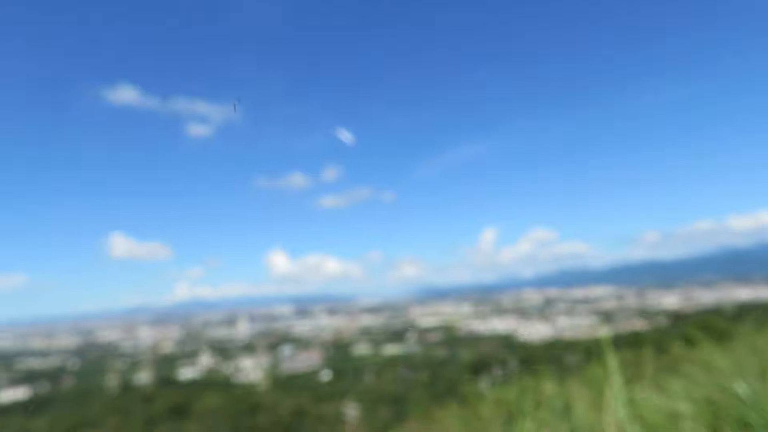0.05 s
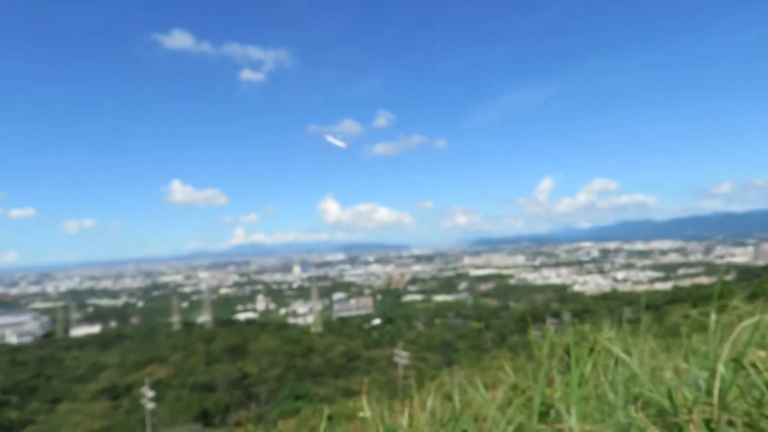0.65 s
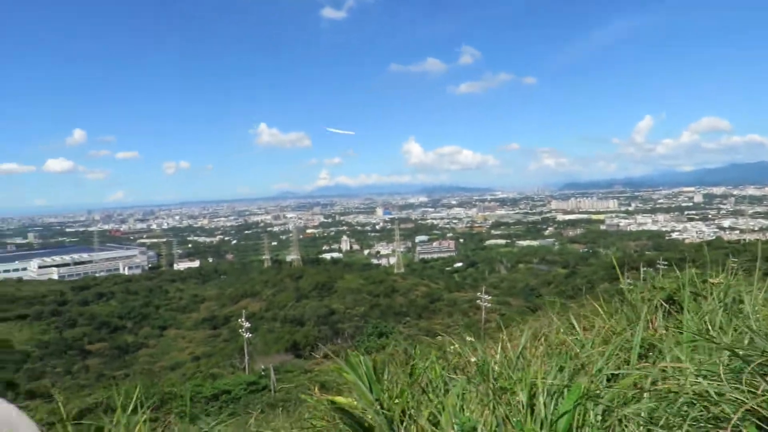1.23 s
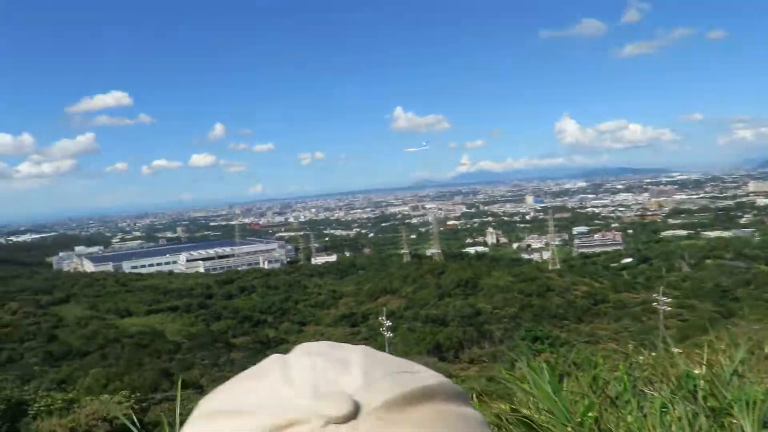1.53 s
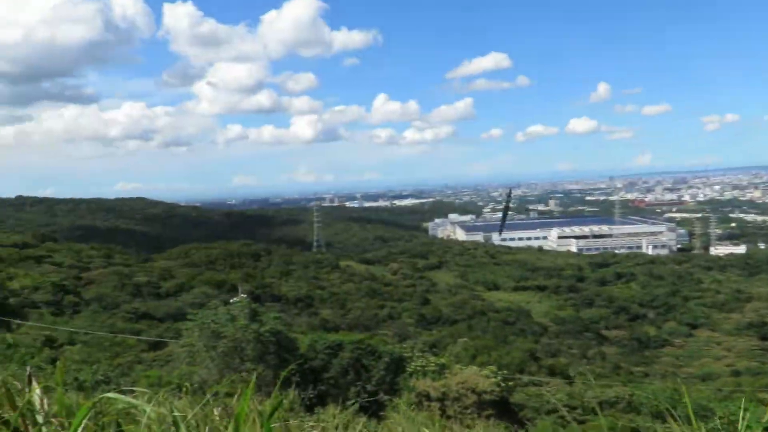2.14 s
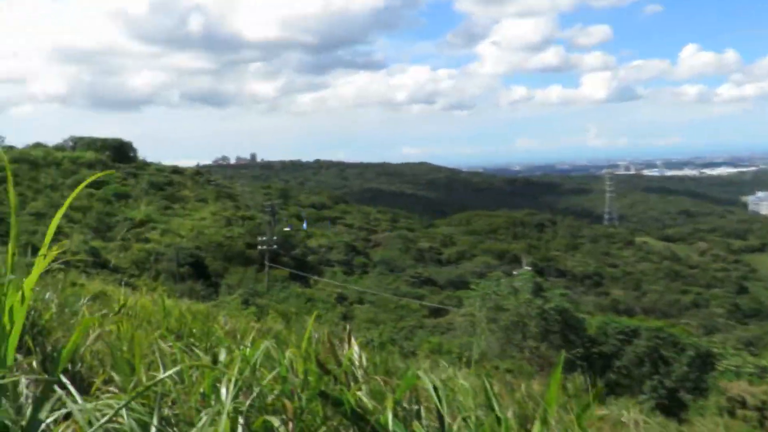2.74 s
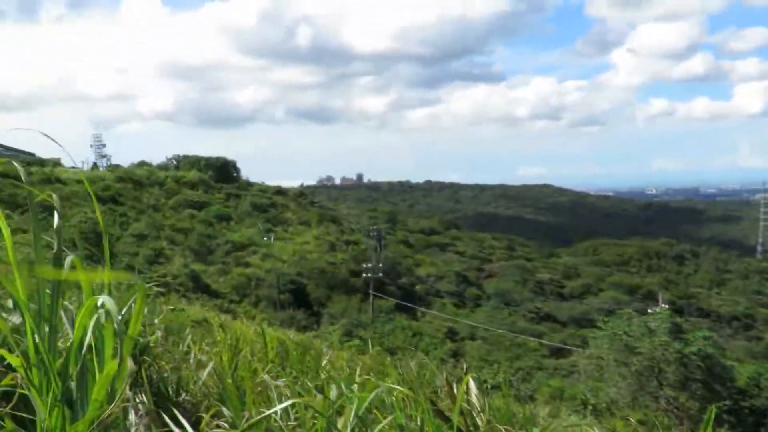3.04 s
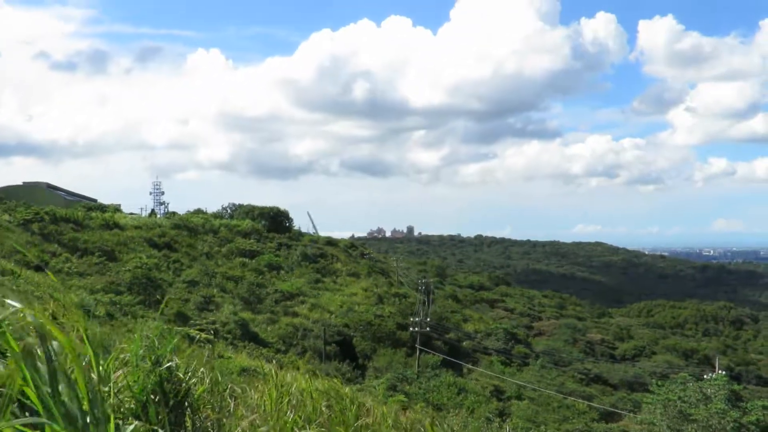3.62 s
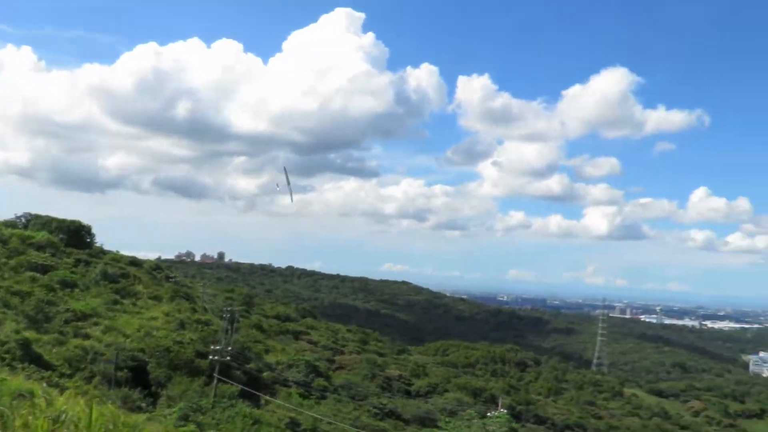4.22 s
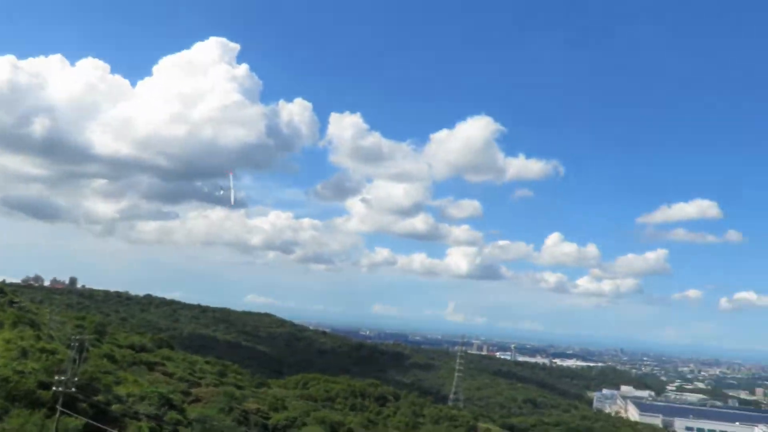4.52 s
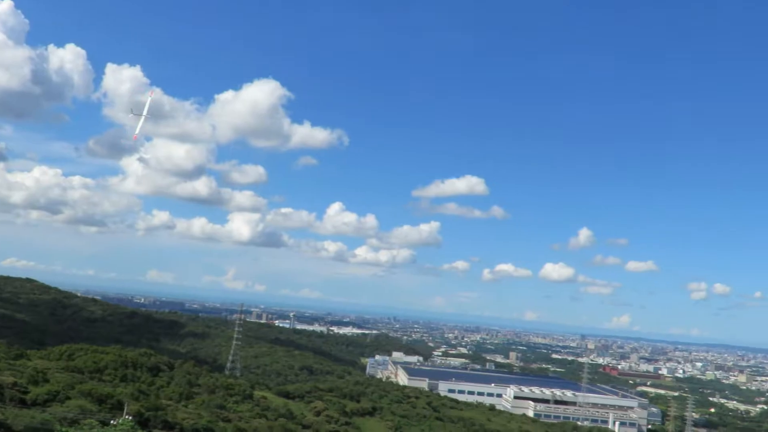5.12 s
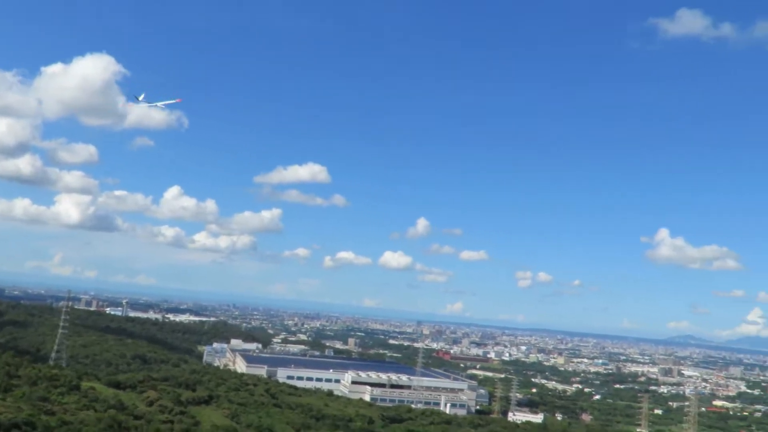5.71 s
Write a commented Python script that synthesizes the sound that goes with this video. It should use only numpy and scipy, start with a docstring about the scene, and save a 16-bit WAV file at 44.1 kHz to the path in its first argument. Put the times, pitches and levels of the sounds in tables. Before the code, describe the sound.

Wind buffets a camera's microphone on an open hilltop from the start, with uneven low thuds and rumbles that build to a rough roar around 1 second. A faint hiss of grass lies underneath. Near 1.8 seconds something hard clicks against the camera, slightly left, with a very short ring. The wind eases, and at about 2.3 seconds a model glider passes with a soft airy rush and a faint, falling whistle. A second sharp click comes at 2.9 seconds amid lighter gusts, and a few soft, dull ticks are scattered around. A hard, rasping gust hits from about 3.4 to 3.8 seconds. A quieter stretch follows from 4 to 5 seconds, with faint, brief whistles from the distant wings. Strong gusts return just after 5 seconds, with another faint whistle between them, and thump and roar loudest from 5.5 until about 6 seconds.

```python
"""From the start, gusts on a grassy hilltop buffet a camera's two microphone ports: turbulent pressure thuds,
rumbles and roars over the hiss of the grass. Near 1.8 s something hard clicks against the camera as it is swung
round, and the case rings. A model glider sweeps past at 2.3 s with an airy rush and a faint whistle that falls
by the Doppler effect, then its rush drops away. A second click follows at 2.9 s. Hard gusts return near 3.5 s
and after 5 s, with faint whistles of the wings between and among them."""
import sys
import numpy as np
from scipy import signal
from scipy.fft import rfft, irfft
from scipy.io import wavfile

SR = 44100
rng = np.random.default_rng(int(sys.argv[2]) if len(sys.argv) > 2 else 0)


def dump_mix(stems):
    """Bounce the given channels to the path in sys.argv[1] as a 16-bit WAV at rate SR."""
    frames = np.atleast_2d(stems).T  # one column per channel
    limited = np.clip(frames, -1, 1)  # hard clip at full scale
    pcm = np.round(limited * 32767).astype(np.int16)
    wavfile.write(sys.argv[1], SR, pcm)


N = 262836
TIME, HZ = np.arange(N) / SR, np.fft.rfftfreq(N, 1 / SR)

# gusts on the ports: start_s, end_s, buffet_db, roar_db, sway_db
GUSTS = [(0.076, 0.453, -50, -63, -38.5), (0.482, 0.526, -41.5, -52, -28.5),
         (0.599, 0.668, -30, -50.5, -27), (0.761, 0.81, -28.5, -46, -33), (0.873, 0.965, -23.5, -42, -51),
         (1.024, 1.067, -26, -27, -37), (1.092, 1.122, -23.5, -31, -49), (1.157, 1.368, -28, -45, -40),
         (1.48, 1.508, -32, -48, -33.5), (1.56, 1.708, -29.5, -40.5, -45.5),
         (1.757, 1.951, -23.5, -47, -41), (2.014, 2.133, -36, -60, -43.5), (2.306, 2.367, -43, -70, -45.5),
         (2.662, 2.967, -35, -63, -32.5), (2.798, 2.852, -26, -52, -52), (2.928, 2.977, -30, -47, -35),
         (3.201, 3.265, -40.5, -62, -41), (3.379, 3.443, -27, -43.5, -30),
         (3.466, 3.639, -21.5, -28.5, -45.5), (3.663, 3.82, -28.5, -39, -33.5),
         (3.855, 3.928, -40, -55, -54), (4.052, 4.089, -36.5, -49, -44), (4.13, 4.164, -41.5, -64, -48.5),
         (4.286, 4.404, -45.5, -71, -50.5), (5.087, 5.221, -27, -42, -38.5),
         (5.329, 5.367, -36.5, -48, -46), (5.376, 5.458, -30, -40, -40.5),
         (5.497, 5.614, -21.5, -37, -33.5), (5.711, 5.914, -25.5, -38.5, -32.5),
         (5.904, 5.95, -28.5, -37.5, -38)]
# lulls between gusts: time_s, depth_db, half_length_s
LULLS = [(0.966, 4, 0.019), (1.088, 2.5, 0.008), (1.154, 1, 0.0063), (1.175, 0.5, 0.011),
         (1.531, 18, 0.015), (2.88, 7, 0.03), (3.033, 17.5, 0.031), (3.505, 3, 0.0068), (3.537, 0.5, 0.007),
         (3.647, 6.5, 0.006), (4.35, 7, 0.0084), (4.404, 16, 0.02), (5.242, 3.5, 0.017), (5.662, 18, 0.01),
         (5.7, 0.5, 0.008), (5.791, 10, 0.013), (5.839, 17, 0.012), (5.938, 8.5, 0.012)]
# the hardest eddies that hit the ports: time_s, thump_db, roar_db, half_length_s
EDDIES = [(0.107, -29.5, -44, 0.0049), (0.213, -33, -61, 0.0035), (0.374, -33.5, -47, 0.0045),
          (0.495, -24, -53, 0.007), (0.596, -14.5, -72, 0.0082), (0.638, -8.5, -58, 0.0037),
          (0.709, -12, -63, 0.0022), (0.852, -14.5, -52, 0.0038), (0.891, -15.5, -49, 0.005),
          (0.925, -21, -34, 0.01), (0.946, -20, -27.5, 0.007), (1.017, -21, -27, 0.0024),
          (1.032, -16.5, -33, 0.0024), (1.048, -22, -18, 0.0036), (1.078, -21, -25, 0.0044),
          (1.116, -27, -20.5, 0.004), (1.13, -18, -17, 0.0033), (1.204, -19.5, -31, 0.0056),
          (1.23, -16.5, -45, 0.0058), (1.291, -22.5, -38.5, 0.0085), (1.349, -16, -34, 0.007),
          (1.372, -20.5, -33, 0.004), (1.507, -23.5, -34, 0.013), (1.585, -16.5, -26, 0.0027),
          (1.613, -24.5, -46, 0.014), (1.659, -38, -30, 0.0074), (1.712, -23.5, -29.5, 0.0035),
          (1.847, -11, -28, 0.0036), (2.358, -24, -53, 0.0042), (2.809, -22.5, -50, 0.0064),
          (2.974, -26.5, -46, 0.0063), (3.287, -22.5, -50, 0.0029), (3.474, -7, -30, 0.0024),
          (3.482, -8.5, -37, 0.006), (3.496, -9.5, -13, 0.0024), (3.503, -8, -16.5, 0.0045),
          (3.549, -16, -23, 0.003), (3.559, -7.5, -21.5, 0.0073), (3.582, -13, -18, 0.0068),
          (3.641, -24, -22.5, 0.0036), (3.597, -34.5, -24.5, 0.0045), (3.615, -14, -19, 0.006),
          (3.66, -24, -28, 0.0019), (3.708, -25, -27, 0.01), (3.794, -21.5, -50, 0.0036),
          (3.815, -37, -28, 0.0053), (4.065, -22, -56, 0.006), (4.091, -20.5, -36, 0.0029),
          (4.31, -32, -48, 0.01), (4.36, -37, -68, 0.0061), (4.423, -31, -58, 0.0024),
          (5.082, -27.5, -32, 0.0043), (5.149, -9, -36, 0.0057), (5.162, -8.5, -31, 0.004),
          (5.174, -13, -23, 0.006), (5.192, -6, -18.5, 0.0028), (5.204, -25, -24.5, 0.0023),
          (5.508, -11, -43, 0.0026), (5.552, -20, -23.5, 0.011), (5.578, -15, -23, 0.007),
          (5.589, -19, -24, 0.0022), (5.615, -19.5, -15.5, 0.0026), (5.639, -16.5, -21.5, 0.0038),
          (5.678, -21, -49, 0.0076), (5.731, -19, -49, 0.0083), (5.814, -4.5, -18, 0.0039),
          (5.835, -9.5, -11.5, 0.0061), (5.868, -26, -24.5, 0.0035), (5.884, -11.5, -23.5, 0.0028)]
# low buffeting: frequency_hz, density_db
BUFFET_SPECTRUM = [(40, -47), (90, -44.5), (150, -10.5), (240, -1.5), (340, 0.1), (430, -0.5), (470, 0),
                   (515, -27.5), (620, -29), (1200, -68), (4000, -100)]
# how unlike the ports are buffeted; the width narrows sharply near 0.9 s: time_s, side_gain_db
BUFFET_WIDTH = [(.08, 14), (.6, 6), (.86, 9.5), (.91, -14.5), (2.1, -28.5), (3.5, -16), (4.3, -24)]
# bass is shared, so the ports differ only higher up: frequency_hz, side_gain_db
BASS_SHARED = [(60, -23.5), (140, -14.5), (250, -5.5), (450, 0)]
# roar of fast air: frequency_hz, density_db
ROAR_SPECTRUM = [(250, -40), (500, 4.5), (660, 3), (900, -5.5), (1150, -10), (1400, -16), (2000, -28.5),
                 (3000, -53), (6000, -58), (15000, -88)]
# rasp of torn air: frequency_hz, density_db
RASP_SPECTRUM = [(700, -18), (1150, 5), (1600, 2.5), (2200, -3.5), (3000, -18), (5000, -26), (9000, -42.5),
                 (15000, -75.5)]
# big slow eddies that thud: time_s, level_db, half_length_s
THUDS = [(0.116, -20, 0.0039), (0.703, -4, 0.0028), (0.768, -19, 0.0083), (0.789, -20, 0.015)]
# their pressure: frequency_hz, density_db
THUD_SPECTRUM = [(60, -28), (110, -18), (160, 4), (220, -2), (330, -9), (700, -64.5), (2000, -100)]
# rumble of wind blowing across the ports: frequency_hz, density_db
RUMBLE_SPECTRUM = [(15, -11.5), (40, -7.5), (80, 2.5), (130, -4.5), (230, -17.5), (400, -42.5), (900, -52),
                   (2000, -56.5), (6000, -100)]
# its envelope: time_s, level_db
RUMBLE_LEVEL = [(.1, -17), (.37, -17.5), (.41, -33), (.65, -30), (.88, -47), (1, -86)]
# deep sway of the air, alike at both ports: frequency_hz, density_db
SWAY_SPECTRUM = [(20, -32.5), (40, -34.5), (65, -16), (100, -5), (140, 1.5), (200, 0.5), (320, -11.5),
                 (700, -64.5), (2500, -100)]

# air rushing over the glider's wings: frequency_hz, density_db
RUSH_SPECTRUM = [(300, -16), (600, 1), (850, 7), (1400, 7), (1800, 3), (2500, -3.5), (4000, -12.5),
                 (8000, -27.5)]
# edge tones of the wing: pitch_ratio, width_hz, level_db
EDGE_TONES = [(1, 30, 5), (.75, 60, -4), (.61, 40, -7)]
# a faint swish each time the glider turns: time_s, level_db, centre_hz
TURN_SWISH = [(1.8, -96, 4200), (1.86, -57, 3750), (1.93, -46, 3210), (2.02, -73, 2680), (2.15, -91, 2444),
              (4.55, -76, 2600), (4.8, -54, 2780), (5, -65, 3320), (5.13, -48.5, 3390), (5.25, -73, 3450)]
# faint, brief whistles of the wings: time_s, level_db, half_length_s, pitch_hz
FAR_WHISTLES = [(2.02, -46, 0.027, 1613), (2.16, -49, .07, 960), (2.24, -50, 0.031, 730),
                (4.004, -52.5, 0.04, 1500), (4.154, -54, 0.074, 2423), (4.221, -59, 0.056, 1840),
                (4.366, -60.5, 0.099, 2550), (4.385, -53, .035, 2040), (5.331, -46, .05, 1385),
                (5.41, -52.5, 0.088, 1620)]

# hard contacts on the camera: start_s, level_db, brightness_db_per_octave, damping_db_per_s
CONTACTS = [(1.7814, -23, 0, 398), (1.7848, -10.5, 3.5, 398), (1.7885, -14.5, 0, 200),
            (1.791, -19.5, -4, 100), (2.9095, -4.5, 1, 700), (2.9127, -13, 0, 900)]
# modes of the camera's case: frequency_hz, level_db, t60_s
CASE_MODES = [(800, -6, 0.026), (1010, -4, 0.017), (1128, 4.5, 0.055), (1410, -0.5, 0.046),
              (1644, 5.5, 0.022), (1906, 1, 0.048), (2330, -1.5, 0.064), (2626, 0, 0.032),
              (2930, -6, 0.029), (3260, -2, .024), (3610, 2, 0.021), (4060, -11, 0.013), (4720, -11, 0.023),
              (5100, -22, .018), (5760, -20, .018), (6440, -3, 0.017), (7100, -26, .016)]
# crack of a contact: frequency_hz, density_db
CRACK_SPECTRUM = [(300, -18), (800, 13.5), (1800, 14), (3600, -3), (4400, -1), (6500, -5), (9000, -6.5),
                  (15000, -15)]
# soft, dull ticks: start_s, level_db, centre_hz, width_octaves
TICKS = [(1.516, -43, 2830, 0.74), (1.968, -35, 1520, 0.22), (2.46, -25.5, 1400, 0.54),
         (3.093, -28.5, 1560, .23), (4.44, -41.5, 1070, .3), (4.468, -36, 1080, 0.34)]

# hiss of the grass: frequency_hz, density_db
GRASS_SPECTRUM = [(30, -18.5), (110, -2), (300, 3.5), (700, 1.5), (1300, 0.5), (2500, -1), (3600, -4.5),
                  (4500, -7.5), (7000, -11), (10000, -12.5), (13000, -12.5), (14300, -16), (15500, -31.5)]
# its envelope: time_s, level_db
GRASS_LEVEL = [(.08, -44), (.8, -42), (1.1, -44.5), (1.6, -43.5), (3.2, -46.5), (3.44, -44.5), (3.85, -46),
               (4.7, -45), (5.14, -42.5), (5.96, -41)]
# the background sinks after the hardest gusts: start_s, depth_db
DIPS = [(0.083, 9.5), (0.601, 11), (0.696, 16.5), (3.47, 13), (3.629, 14), (5.16, 8.5), (5.81, 7.5)]
# distant sound reaches the two ports out of step: frequency_hz, side_minus_mid_db
PORT_SPREAD = [(500, -44), (1500, -60.5), (2400, -16.5), (3300, -10), (4500, -5), (6400, 0.5), (8100, 3),
               (10000, 8), (13000, 18.5), (15000, 30.5)]


def wind():
    """Turbulent pressure: gusts and eddies buffet the ports, and the strongest tear into roar and rasp."""
    puffs = amp(2.5 * flutter(26)) ** 2  # small eddies make every gust uneven
    buffet_power = puffs * gust_power(column=2, fall_db_per_s=190.5)
    roar_power = puffs * gust_power(column=3, fall_db_per_s=264)  # roar needs speed, so it dies first
    for time_s, thump_db, roar_db, half_length_s in EDDIES:
        passing = bump(time_s, half_length_s)
        buffet_power += amp(thump_db) ** 2 * passing
        roar_power += amp(roar_db) ** 2 * passing
    buffet_gain, roar_gain = np.sqrt(buffet_power), np.sqrt(roar_power)
    mid, side = (turbulence(BUFFET_SPECTRUM, flutter_hz=49.4, depth_db=7.5, steady_hz=36) for _ in range(2))
    side = side * buffet_gain * amp(curve(BUFFET_WIDTH))
    side = irfft(rfft(side) * colour(BASS_SHARED), N)
    buffet = ports(buffet_gain * mid, side)
    mid, side = (turbulence(ROAR_SPECTRUM, flutter_hz=108, depth_db=5, steady_hz=34) for _ in range(2))
    roar = ports(mid, side * amp(-11))
    mid, side = (turbulence(RASP_SPECTRUM, flutter_hz=160, depth_db=13, steady_hz=32) for _ in range(2))
    rasp_share = amp(-23.5) * (roar_gain / amp(-20.5)) ** 0.32  # gains 0.32 dB for each dB of roar
    rasp = rasp_share * ports(mid, side * amp(5))
    return buffet + roar_gain * (roar + rasp)


def gust_power(column, fall_db_per_s, rise_db_per_s=747):
    """Incoherent sources add in power: each gust builds, holds and dies away, and lulls cut into the sum."""
    power = np.zeros(N)
    for gust in GUSTS:
        early_s, late_s = np.maximum(gust[0] - TIME, 0), np.maximum(TIME - gust[1], 0)
        power += amp(gust[column] - rise_db_per_s * early_s - fall_db_per_s * late_s) ** 2
    lull_db = sum(depth_db * bump(time_s, half_length_s) for time_s, depth_db, half_length_s in LULLS)
    return power * amp(-lull_db) ** 2


def turbulence(spectrum, flutter_hz, depth_db, steady_hz):
    """Intermittency: pressure noise comes in short bursts, while its slower power is held even."""
    pressure = noise(colour(spectrum)) * amp(depth_db * flutter(flutter_hz))
    slow_power = irfft(rfft(pressure ** 2) * low_pass(steady_hz), N)
    return pressure / np.sqrt(np.maximum(slow_power, 0) + 1e-3)


def thuds():
    """Coherent pressure: the largest eddies push both ports at once."""
    power = sum(amp(level_db) ** 2 * bump(time_s, half_s) for time_s, level_db, half_s in THUDS)
    pressure = turbulence(THUD_SPECTRUM, flutter_hz=25, depth_db=11, steady_hz=35.2)
    return ports(np.sqrt(power) * pressure, 0)


def rumble():
    """Deep pressure swings: at first mostly in antiphase at the ports, later in phase with each other."""
    shape = colour(RUMBLE_SPECTRUM)
    opposed = amp(curve(RUMBLE_LEVEL)) * ports(amp(-16) * noise(shape), noise(shape))
    push = np.sqrt(gust_power(column=4, fall_db_per_s=131.5))
    sway = push * turbulence(SWAY_SPECTRUM, flutter_hz=3.1, depth_db=-2, steady_hz=1.9)
    return opposed + ports(sway, 0)


def glider(pass_s=2.34, speed_m_per_s=22, closest_m=6.6, whistle_hz=1505, drop_s=2.7):
    """A moving source: rush and edge tones beam fore and aft, and the Doppler effect lowers the tones."""
    along_m = speed_m_per_s * (TIME - pass_s)
    distance_m = np.hypot(closest_m, along_m)
    receding, abeam = along_m / distance_m, (closest_m / distance_m) ** 2
    loss_db = 9.5 * np.log2(distance_m / closest_m)
    since_drop_s = np.maximum(TIME - drop_s, 0)
    # both are louder from behind; near 2.7 s the rush drops at once and the whistle outlasts it
    rush_db = -35.5 + 4.5 * receding - 9.5 * abeam - loss_db - 12.5 * np.minimum(since_drop_s / 0.049, 1)
    whistle_db = -42.5 + 8 * receding - 18.5 * abeam - loss_db - 54.5 * since_drop_s
    rush = amp(rush_db) * diffuse(colour(RUSH_SPECTRUM))
    mach = speed_m_per_s / 343
    heard_hz = whistle_hz / (1 + receding * mach)
    whistle = sum(amp(whistle_db + level_db) * narrowband(ratio * heard_hz, width_hz)
                  for ratio, width_hz, level_db in EDGE_TONES)
    return rush + airborne(whistle + far_wings())


def far_wings(rise_octaves_per_s=0.26):
    """Flow noise of the wings: a swish at each turn, and brief whistles that rise with gathering speed."""
    sound = amp(curve(TURN_SWISH)) * narrowband(curve(TURN_SWISH, column=2), width_hz=460)
    for time_s, level_db, half_length_s, pitch_hz in FAR_WHISTLES:
        rising_hz = pitch_hz * 2 ** (rise_octaves_per_s * (TIME - time_s))
        envelope = amp(level_db) * np.sqrt(bump(time_s, half_length_s))
        sound += envelope * narrowband(rising_hz, width_hz=5.5)
    return sound


def clicks(crack_decay_s=0.0037, attack_s=0.0012):
    """Impact excitation: each contact cracks and rings the case's modes, damped by what touches it."""
    sound, t = np.zeros(N), np.arange(SR // 10) / SR
    crack_noise = noise(colour(CRACK_SPECTRUM))
    for start_s, level_db, brightness_db_per_octave, damping_db_per_s in CONTACTS:
        span = slice(round(start_s * SR), round(start_s * SR) + len(t))
        ring = np.zeros(len(t))
        for k, (hz, mode_db, t60_s) in enumerate(CASE_MODES):
            tilt_db = brightness_db_per_octave * np.log2(hz / 2000)
            decay_db = (60 / t60_s + damping_db_per_s) * t
            ring += (-1) ** k * amp(mode_db + tilt_db - decay_db) * np.sin(2 * np.pi * hz * t)
        crack = crack_noise[span] * np.exp(-t / crack_decay_s)
        attack = 1 - np.exp(-t / attack_s)
        sound[span] += amp(level_db) * attack * (amp(-10) * ring + amp(-8.5) * crack)
    return airborne(sound) * amp([[0.86], [-0.86]])  # slightly to the left


def ticks(rise_s=0.0019):
    """Band-limited transients: a few milliseconds of noise about one pitch are heard as a dull tap."""
    sound = np.zeros(N)
    skirt = amp(-25.5) / (1 + (HZ / 5000) ** 2)
    for start_s, level_db, centre_hz, width_octaves in TICKS:
        age = np.maximum(TIME - start_s, 0) / rise_s
        envelope = age * np.exp(1 - np.minimum(age, 50))
        band = np.exp(-.5 * (np.log2((HZ + 1) / centre_hz) / width_octaves) ** 2)
        sound += amp(level_db) * envelope * noise(band + skirt)
    return airborne(sound)


def grass():
    """Superposition: countless rustling blades merge into one hiss from all around."""
    rustle_db = 1.1 * noise(np.exp(-HZ / 25))
    return amp(curve(GRASS_LEVEL) + rustle_db) * diffuse(colour(GRASS_SPECTRUM))


def dips(attack_s=0.04, recovery_db_per_s=10):
    """Attack and release: at each listed time the background gain sinks quickly and creeps back."""
    sunk_db = np.zeros(N)
    for start_s, depth_db in DIPS:
        age_s = np.maximum(TIME - start_s, 0)
        dip_db = depth_db * np.minimum(age_s / attack_s, 1) - recovery_db_per_s * age_s
        sunk_db = np.maximum(sunk_db, dip_db)
    return amp(-sunk_db)


def airborne(sound):
    """Phase difference: for a distant sound, side is in quadrature with mid and grows in the treble."""
    spread = colour(PORT_SPREAD)
    mid = rfft(sound) / np.sqrt(1 + spread ** 2)
    return ports(irfft(mid, N), irfft(1j * mid * spread, N))


def diffuse(gain, coherence=0.4):
    """Partial coherence: in noise from many directions, side is mostly unrelated to mid."""
    left, right = airborne(noise(gain))
    stray_left, stray_right = airborne(noise(gain))
    side = coherence * (left - right) + np.sqrt(1 - coherence ** 2) * (stray_left - stray_right)
    return ports(left + right, side) / 2


def ports(mid, side):
    """Sum and difference: left and right from their common part (mid) and their opposed part (side)."""
    return np.array([mid + side, mid - side])


def narrowband(pitch_hz, width_hz):
    """Quadrature modulation centres a narrow band of noise on a pitch curve."""
    band = 1 / (1 + (HZ / width_hz) ** 2)
    phase = 2 * np.pi * np.cumsum(pitch_hz) / SR
    return unit(noise(band) * np.cos(phase) + noise(band) * np.sin(phase))


def flutter(rate_hz):
    """Low-passed noise: a slow random fluctuation of rms 1."""
    return noise(low_pass(rate_hz))


def noise(gain):
    """Spectral shaping turns white noise into coloured noise of rms 1."""
    return unit(irfft(rfft(rng.standard_normal(N)) * gain, N))


def low_pass(width_hz):
    """Gaussian low-pass response."""
    return np.exp(-.5 * (HZ / width_hz) ** 2)


def colour(spectrum):
    """Interpolation in log frequency gives a gain for every frequency."""
    hz, db = np.transpose(spectrum)
    return amp(np.interp(np.log(HZ + 1), np.log(hz), db))


def curve(rows, column=1):
    """Linear interpolation of one column in time."""
    rows = np.asarray(rows)
    return np.interp(TIME, rows[:, 0], rows[:, column])


def bump(time_s, half_length_s):
    """Gaussian pulse of height 1."""
    return np.exp(-np.minimum(((TIME - time_s) / half_length_s) ** 2, 50))


def amp(db):
    """Decibels to amplitude ratio."""
    return 10 ** (np.asarray(db) / 20)


def unit(x):
    """Normalisation to rms 1."""
    return x / np.sqrt(np.mean(x ** 2) + 1e-20)


def scene():
    """Superposition: the pressures of all sources on the hilltop add at the two ports."""
    return wind() + rumble() + thuds() + dips() * (grass() + glider()) + clicks() + ticks()


def record(dry, open_s=0.08, ceiling=0.95, cutoff_hz=15500):
    """Saturation and band limiting: the camera opens its input, rounds the peaks and cuts the top treble."""
    opened = dry * np.clip((TIME - open_s) / .008, 0, 1)
    rounded = opened / (1 + (opened / ceiling) ** 6) ** (1 / 6)
    band_limit = signal.firwin(511, cutoff_hz, window=("kaiser", 9), fs=SR)
    return signal.oaconvolve(rounded, band_limit[None], "same")


dry = scene()
out = record(dry)
dump_mix(out)
```